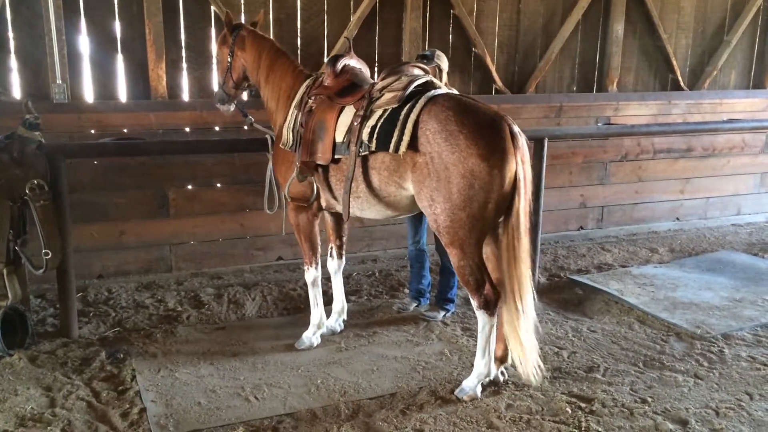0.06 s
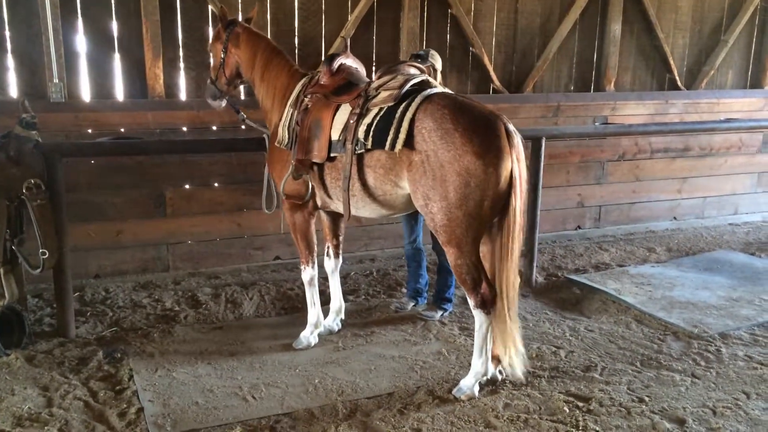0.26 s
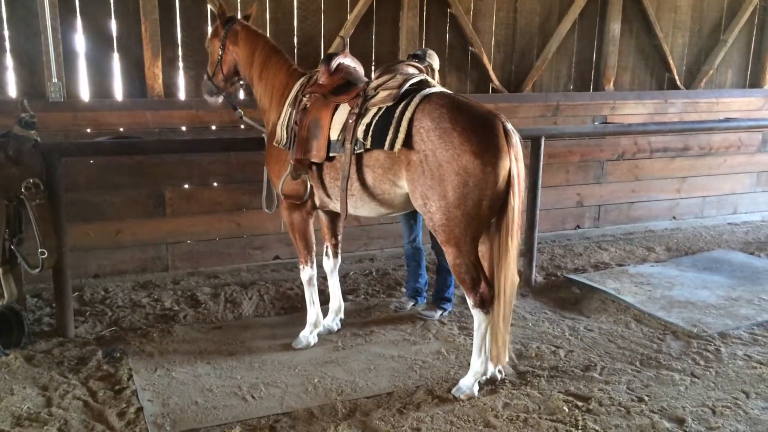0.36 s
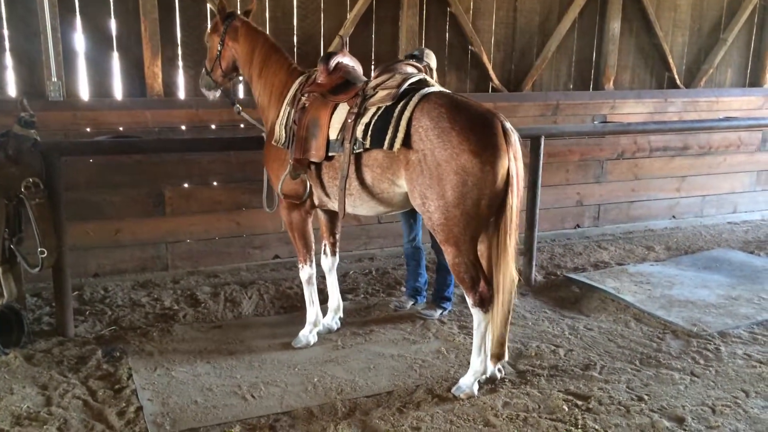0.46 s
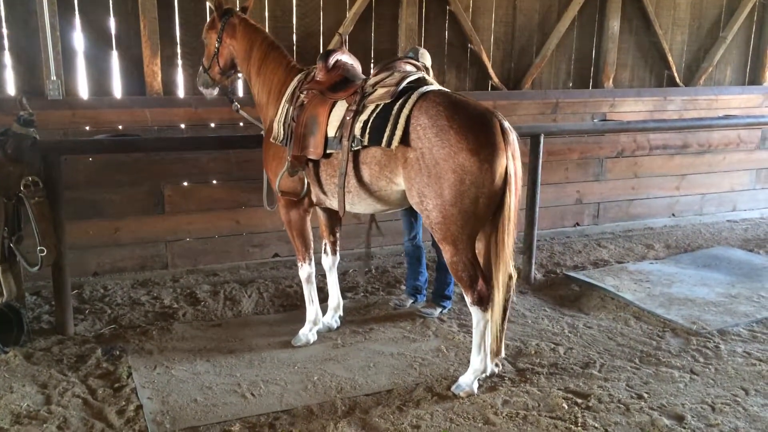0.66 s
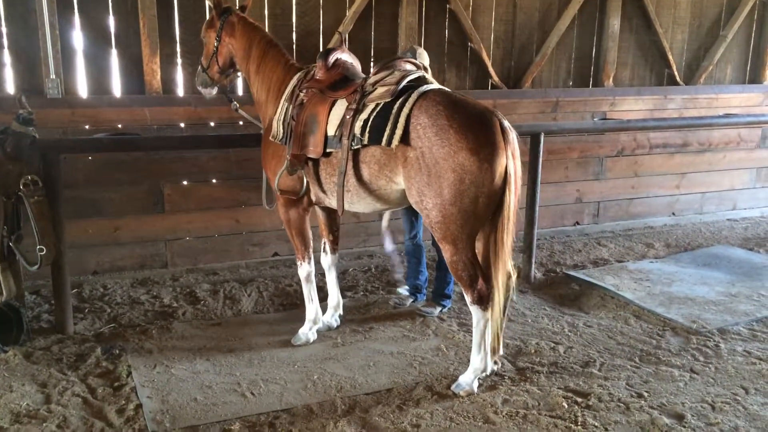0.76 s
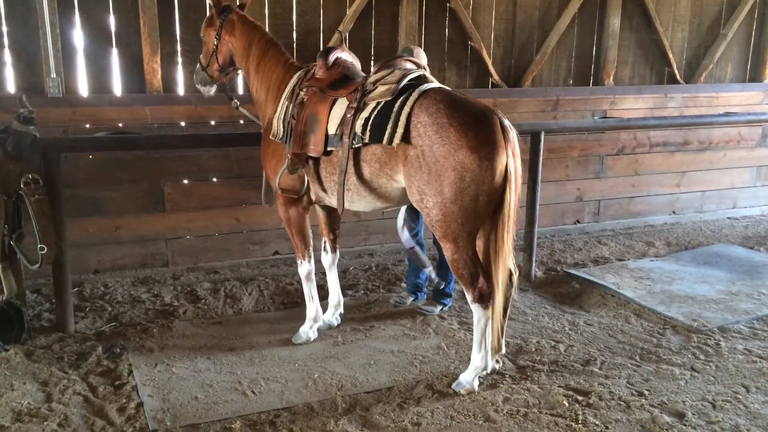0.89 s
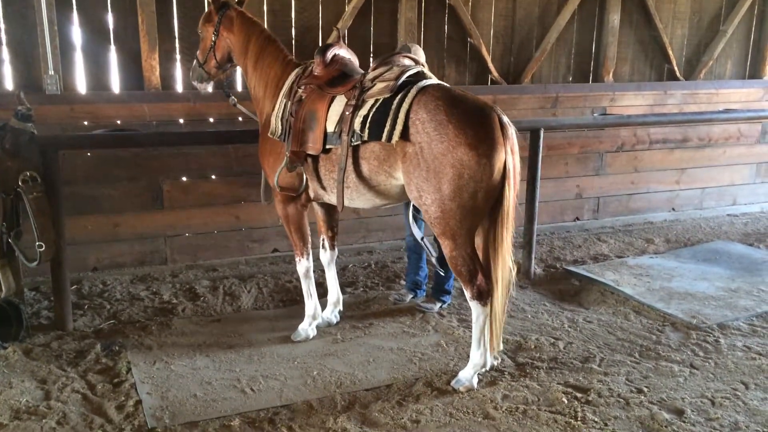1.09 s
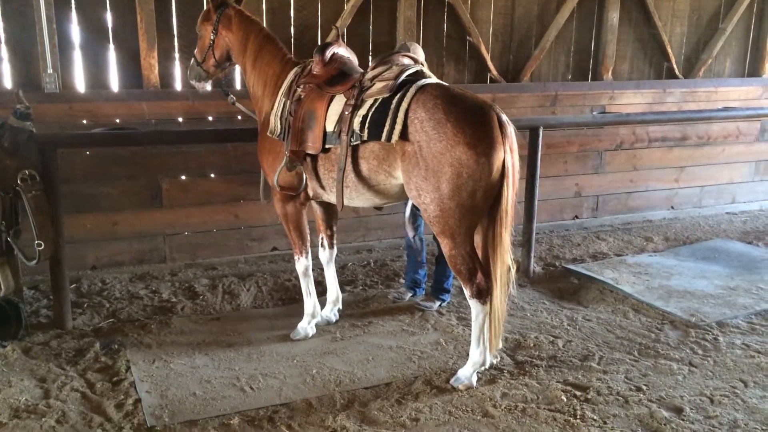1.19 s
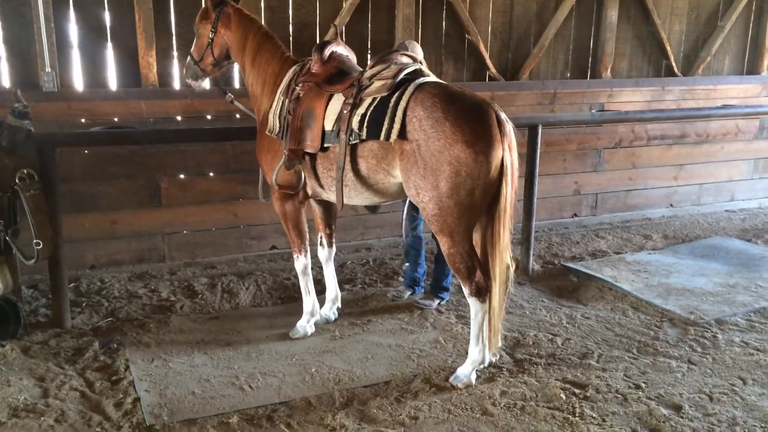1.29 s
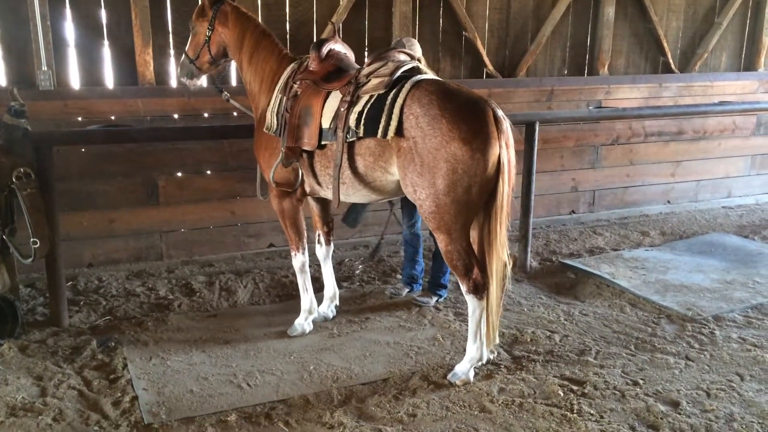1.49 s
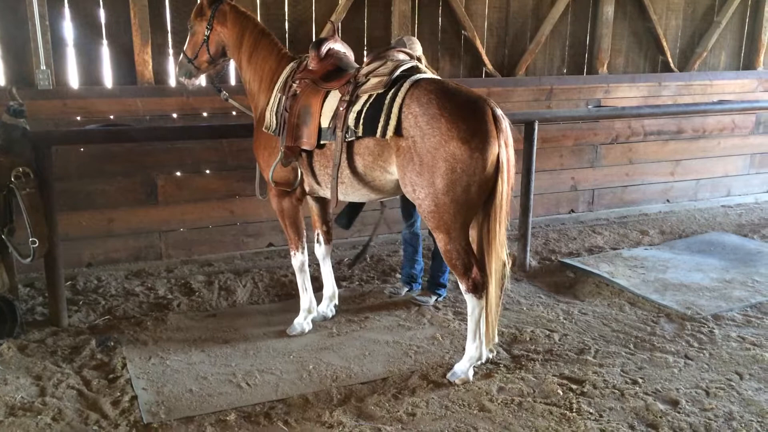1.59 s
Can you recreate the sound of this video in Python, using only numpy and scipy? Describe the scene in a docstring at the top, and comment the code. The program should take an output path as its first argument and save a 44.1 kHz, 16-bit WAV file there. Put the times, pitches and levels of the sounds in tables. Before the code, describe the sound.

Metal horse tack clinks close by in a quiet barn. After a faint leather rub and low bump, a hook and buckle clack and jingle from about 0.2 to 0.5 seconds, and a small ring pings near 0.7. After a short lull, dull knocks and more bright clinks come from 1.2 to 1.4 seconds. A soft, hollow wooden knock and a brief leather rub follow at 1.6.

```python
"""Tack in a wooden barn

A saddled horse is handled in a quiet barn, close to a single microphone. Leather rubs and
low bumps swell over the faint air. Hanging tack swings: a snap hook clacks, a buckle jingles
and a small ring pings, each ringing in its own modes when struck. A few dull knocks fall among
them, the last hollow like wood. The plank walls answer the metal and the knocks."""
import sys
import numpy as np
from scipy import signal
from scipy.fft import rfft, irfft
from scipy.io import wavfile

SR = 44100
rng = np.random.default_rng(int(sys.argv[2]) if len(sys.argv) > 2 else 0)


def master_out(mix):
    """Clip the mix to full scale and print it as 16-bit PCM to the path in sys.argv[1]."""
    frames = np.transpose(np.atleast_2d(mix))
    ceiling = np.clip(frames, -1, 1)
    pcm = np.round(ceiling * 32767).astype(np.int16)
    wavfile.write(sys.argv[1], SR, pcm)


N = 72765
TIME = np.arange(N) / SR
BOUNCES_PER_S, SHORTEST_CONTACT_S = 3000, 0.001
FIRM_S, RISE_SHARE = 0.0043, 0.64  # longer contacts than this slide in, over a share of their length


def from_db(db):
    """Decibels to gain."""
    return 10 ** (np.asarray(db) / 20)


def unit(x):
    """Scale to an energy of one."""
    return x / np.sqrt(np.sum(x ** 2) + 1e-20)


def noise(colour):
    """Noise of rms one with the given colour."""
    hz, db = np.transpose(colour)
    bins_hz = np.arange(N // 2 + 1) * SR / N
    gain = from_db(np.interp(np.log(bins_hz + 1e-9), np.log(hz), db))
    return unit(irfft(rfft(rng.standard_normal(N)) * gain, N)) * np.sqrt(N)


def highpass(x, hz):
    """Roll off what lies below a frequency."""
    return signal.sosfilt(signal.butter(2, hz, "high", fs=SR, output="sos"), x)


def add(out, start_s, x):
    """Mix a sound in at its time."""
    i = int(np.clip(start_s * SR, 0, N - 1))
    out[i:i + len(x)] += x[:N - i]


def dying(start_s, decay_s):
    """An envelope that jumps up and dies away."""
    return (TIME >= start_s) * np.exp(-np.abs(TIME - start_s) / decay_s)


def sliding(start_s, length_s):
    """The longer a contact lasts, the more gently it begins."""
    rise = 1 - np.exp(-np.abs(TIME - start_s) / (RISE_SHARE * length_s))
    return rise * dying(start_s, length_s)


def contact(chatter_s, size=2048):
    """A first touch, firm in short contacts, followed by a dying chatter of tiny bounces."""
    bounces = rng.standard_normal(size) * (rng.random(size) < BOUNCES_PER_S / SR)
    firm = np.exp(-chatter_s / FIRM_S)
    force = (1 - firm) * unit(bounces * sliding(0, chatter_s)[:size])
    force[0] += firm
    return unit(force)


def struck(modes, chatter_s, stretch=1, size=12000):
    """One contact sets each mode ringing, at most to its own level; neighbours swing opposite ways."""
    force, t, out = contact(chatter_s), TIME[:size], 0
    for k, (hz, db, t60_s) in enumerate(modes):
        mode = np.sin(2 * np.pi * hz * stretch * t) * from_db(db - 60 * t / t60_s)
        rung = signal.fftconvolve(force, mode)
        excitation = np.linalg.norm(rung) / np.linalg.norm(mode)
        out = out + (-1) ** k * rung / max(excitation, 0.6)
    return out


def strikes(hits, modes):
    """A freely ringing piece sounds on after each touch."""
    out = np.zeros(N)
    for start_s, db, chatter_s in hits:
        add(out, start_s, from_db(db) * struck(modes, chatter_s))
    return out


def swells(rows, colour):
    """Brief rounded swells of noise."""
    envelope = sum(from_db(db) * np.exp(-((TIME - centre_s) / half_s) ** 2)
                   for centre_s, db, half_s in rows)
    return envelope * noise(colour)


# Colour of the room tone, all around the microphone: frequency_hz, relative_db
AIR_COLOUR = [(20, -4), (40, -14.5), (70, 3), (130, -2), (200, -0.5), (290, -7), (420, -7), (800, -12.5),
              (1700, -15.5), (2050, -15.5), (2800, -19.5), (4400, -19.5), (6000, -24.5), (8100, -24.5),
              (15500, -27.5)]
def barn_air(level_db=-68.5, waver_db=1.5, wavers_per_s=13):
    """The faint air of the barn, its level wavering slightly."""
    waver = np.interp(TIME * wavers_per_s, np.arange(64), rng.standard_normal(64))
    return from_db(level_db - waver_db * waver) * noise(AIR_COLOUR)


# Low bumps, dry at the microphone: centre_s, level_db, half_length_s
BUMPS = [(.04, -63, 0.027), (.39, -66, .02), (.63, -77, 0.045), (1.238, -66, 0.0057)]
# Their colour: frequency_hz, relative_db
BUMP_COLOUR = [(18, -22), (45, -2), (80, 7), (120, -8), (300, -43), (2000, -80)]
def low_bumps():
    """Soft bumps, each a short swell of deep rumble."""
    return swells(BUMPS, BUMP_COLOUR)


# Leather moving close by: centre_s, level_db, half_length_s
RUBS = [(.08, -73, 0.077), (.175, -70.5, 0.034), (1.098, -81, 0.016), (1.563, -66.5, 0.027),
        (1.617, -67, 0.021)]
# Colour of the rubbing: frequency_hz, relative_db
RUB_COLOUR = [(300, 4), (1000, 4), (2000, 1.5), (4000, 3), (6500, 3), (10000, -6), (15000, -13)]
def leather_rubs():
    """Sliding straps give brief swells of friction noise."""
    return swells(RUBS, RUB_COLOUR)


# The snap hook, near the microphone; upper_db and tick_db are offsets from level_db:
# start_s, level_db, pitch_hz, upper_db, tick_db, chatter_s
HOOK_HITS = [(0.15, -49, 6700, 8, -4, 0.0075), (0.153, -40, 6900, -14, 1, 0.0075),
             (0.17, -55, 6600, -3, 10.5, 0.02), (.232, -38, 6930, -13, -3.5, 0.008),
             (.246, -38.5, 6850, 6.5, 15, 0.0049), (.254, -45, 6680, 9, -5, 0.021),
             (0.266, -30, 6900, -15, -3, 0.0089), (0.319, -49, 6860, 10, 11.5, 0.0034),
             (0.385, -37, 6960, -13.5, -1.5, 0.0045), (0.458, -32, 6730, -13, -17, 0.0019),
             (0.466, -26.5, 6615, -9, -2.5, 0.0037), (0.472, -28, 7010, -3.5, -25, 0.0026),
             (0.499, -42.5, 6760, 1, 3, 0.0064), (0.526, -58, 6340, 12, 8, 0.0081),
             (0.648, -70.5, 6660, 6, 3, 0.0018), (0.6706, -43, 6800, 5, 2, .002),
             (0.6762, -38.5, 6930, -4, 4.5, 0.0016), (.743, -53, 6930, -4, 8.5, .004),
             (.930, -71.5, 6780, 4, 14, 0.0027), (1.188, -56, 6950, -15, 3.5, 0.0061),
             (1.202, -57, 7100, 1, 2, 0.0025), (1.2253, -36, 6970, 1, -4, 0.0025),
             (1.232, -34.5, 6886, -31, -3, 0.001), (1.300, -45, 6440, 3.5, -12, 0.0042),
             (1.306, -26.5, 6852, -19.5, -15, 0.0023), (1.313, -40, 6700, -48, -10, .002),
             (1.34, -48, 6780, -11, 5, 0.0013), (1.351, -56, 6750, -10, 12, .002),
             (1.3705, -34.5, 6924, -3, -8, 0.0012), (1.425, -58, 7070, -16, 7.5, 0.0041),
             (1.579, -52, 6780, -6.5, 0.5, 0.011)]
# Its lower modes, scaled in each hit by pitch_hz / reference_hz: frequency_hz, relative_db, t60_s
HOOK_LOWER_MODES = [(6370, -17, 0.05), (6666, -6, 0.035), (6995, -1, 0.029), (7010, -25.5, 0.025)]
# Its upper modes: frequency_hz, relative_db, t60_s
HOOK_UPPER_MODES = [(9330, -15, 0.035), (9490, -3, 0.031), (9810, -4.5, 0.015)]
# Colour of the bare tick of metal on metal: frequency_hz, relative_db
TICK_COLOUR = [(1000, -36), (2200, -11), (3000, 2), (3900, -3), (4500, 0.5), (5300, 0), (7500, 8.5),
               (9500, -2), (11500, -2), (13700, -1.5), (15500, -8.5)]
def snap_hook(reference_hz=6880, lowest_hz=5300, tick_trim_db=-7):
    """Each contact ticks and rings two clusters of modes; the hook radiates little below lowest_hz."""
    clacks, tick_envelope = np.zeros(N), np.zeros(N)
    for start_s, db, pitch_hz, upper_db, tick_db, chatter_s in HOOK_HITS:
        lower = struck(HOOK_LOWER_MODES, chatter_s, pitch_hz / reference_hz)
        upper = from_db(upper_db) * struck(HOOK_UPPER_MODES, chatter_s)
        add(clacks, start_s, from_db(db) * (lower + upper))
        touch = sliding(start_s, SHORTEST_CONTACT_S + chatter_s)
        tick_envelope += from_db(db + tick_db + tick_trim_db) * touch
    return highpass(clacks, lowest_hz) + tick_envelope * noise(TICK_COLOUR)


# The buckle on the hanging tack: start_s, level_db, chatter_s
BUCKLE_HITS = [(.2445, -36, 0.0027), (.2515, -29.5, 0.0036), (.2625, -31, 0.0014)]
# Its modes: frequency_hz, relative_db
BUCKLE_MODES = [(2980, -28), (4691, -15), (5865, -19), (5964, -14), (6394, -15), (6597, -10), (6932, -1),
                (7028, -3), (7971, -4), (8050, -14), (9131, -15), (11523, -4), (11643, -13), (14717, -9),
                (15230, -5)]
def buckle(t60_s=0.058):
    """Three quick touches set the buckle jingling; all its modes die at one rate."""
    return strikes(BUCKLE_HITS, [(hz, db, t60_s) for hz, db in BUCKLE_MODES])


# Dull knocks nearby; scuff_db is an offset from level_db: start_s, level_db, scuff_db
KNOCKS = [(.562, -57, -19), (0.716, -57, 0), (1.18, -46, -10.5), (1.2247, -53, -2), (1.2313, -40.5, -8.5),
          (1.602, -57, -3)]
# What they ring with: frequency_hz, relative_db, t60_s
KNOCK_MODES = [(151, -13.5, 0.032), (196, -2, 0.063), (237, -7, 0.051), (403, -8.5, 0.043)]
# Colour of their scuff: frequency_hz, relative_db
SCUFF_COLOUR = [(150, -8), (400, 4), (700, -5.5), (1200, 1.5), (2200, -9), (5000, -19.5), (12000, -47)]
def dull_knocks(lowpass_hz=910, scuff_decay_s=0.018, scuff_trim_db=-11):
    """Soft blows ring a few low modes, each blow with a short scuff."""
    blows, scuff_envelope = np.zeros(N), np.zeros(N)
    for start_s, db, scuff_db in KNOCKS:
        add(blows, start_s, from_db(db) * struck(KNOCK_MODES, SHORTEST_CONTACT_S))
        scuff_envelope += from_db(db + scuff_db + scuff_trim_db) * dying(start_s, scuff_decay_s)
    softened = signal.sosfilt(signal.butter(2, lowpass_hz, fs=SR, output="sos"), blows)
    return softened + scuff_envelope * noise(SCUFF_COLOUR)


# The small ring on the same tack: start_s, level_db, chatter_s
RING_HITS = [(.671, -44, 0.0049), (.743, -56.5, 0.0016), (1.3695, -52.5, 0.0018)]
# Its modes: frequency_hz, relative_db, t60_s
RING_MODES = [(4390, -16.5, 0.12), (7980, -8.5, .06), (12980, -8.5, 0.084), (15170, -9, 0.12)]
def small_ring():
    """The struck ring pings in four high, widely spaced modes."""
    return strikes(RING_HITS, RING_MODES)


# The last knock in the barn: start_s, level_db, chatter_s
HOLLOW_HITS = [(1.6035, -55, 0.0028)]
# Its modes: frequency_hz, relative_db, t60_s
HOLLOW_MODES = [(191, 2.5, 0.16), (593, 0.5, 0.038), (760, 2.5, 0.022), (900, -4, 0.027), (1045, -4.5, .04),
                (1560, -4, 0.029)]
def hollow_knock():
    """One blow rings hollow, like wood, its lowest mode lasting longest."""
    return strikes(HOLLOW_HITS, HOLLOW_MODES)


NEAR_DB, NEAR_DELAY_S, NEAR_DECAY_S = -8.5, 0.002, 0.0082
TAIL_DB, TAIL_DELAY_S, TAIL_T60_S = -7.5, 0.0042, 0.35
TREBLE_HZ, TREBLE_T60_S = 8300, 0.17
def barn_reflections(x):
    """Horse and floor reflect to the microphone first, then the walls' tail, whose treble dies sooner."""
    sparse = rng.standard_normal(N) * (rng.random(N) < 0.03)
    near = unit(sparse * dying(NEAR_DELAY_S, NEAR_DECAY_S))
    white = rng.standard_normal(N)
    low = signal.sosfiltfilt(signal.butter(2, TREBLE_HZ, fs=SR, output="sos"), white)
    low_tail = low * dying(TAIL_DELAY_S, TAIL_T60_S / np.log(1000))
    treble_tail = (white - low) * dying(TAIL_DELAY_S, TREBLE_T60_S / np.log(1000))
    response = from_db(NEAR_DB) * near + from_db(TAIL_DB) * unit(low_tail + treble_tail)
    return signal.fftconvolve(x, response)[:N]


def scene():
    """Tack and knocks at close range, in mono, with the barn behind them."""
    metal = highpass(buckle() + snap_hook() + small_ring(), hz=2000)  # small parts radiate little bass
    knocks = dull_knocks() + hollow_knock()
    background = leather_rubs() + low_bumps() + barn_air()
    reflections = barn_reflections(metal + from_db(-1) * knocks)
    return (metal + knocks + reflections + background)[None]


def record(dry):
    """The microphone's signal is cut steeply above 15.3 kHz."""
    return signal.sosfilt(signal.ellip(12, 0.1, 70, 15300, fs=SR, output="sos"), dry)


dry = scene()
out = record(dry)
master_out(out)
```